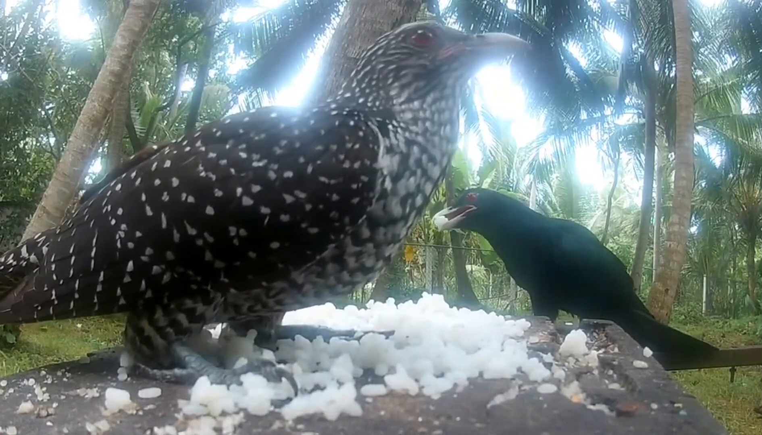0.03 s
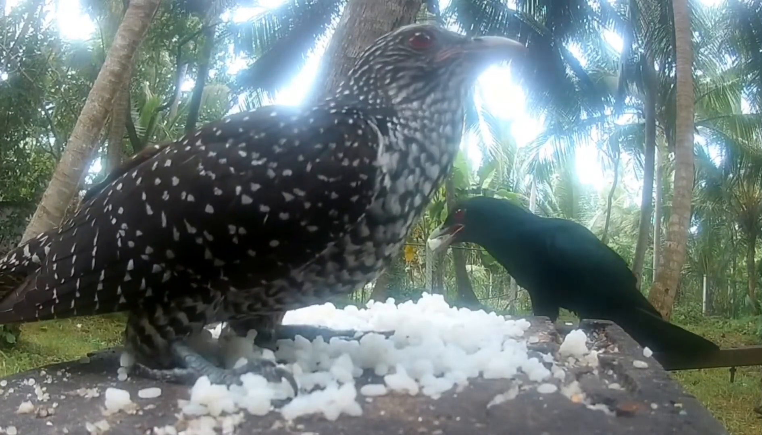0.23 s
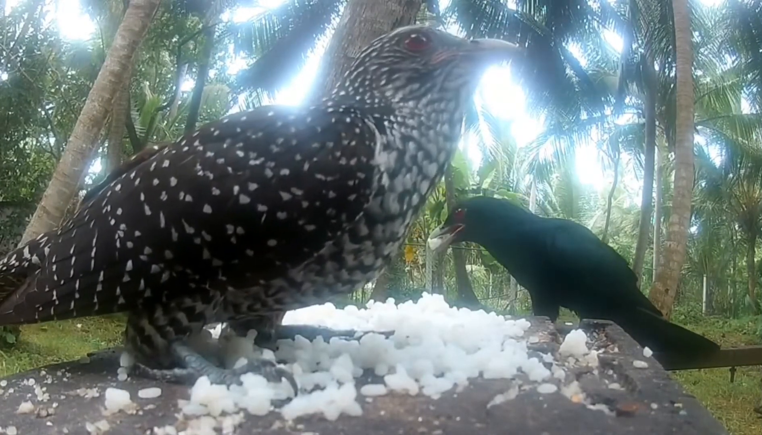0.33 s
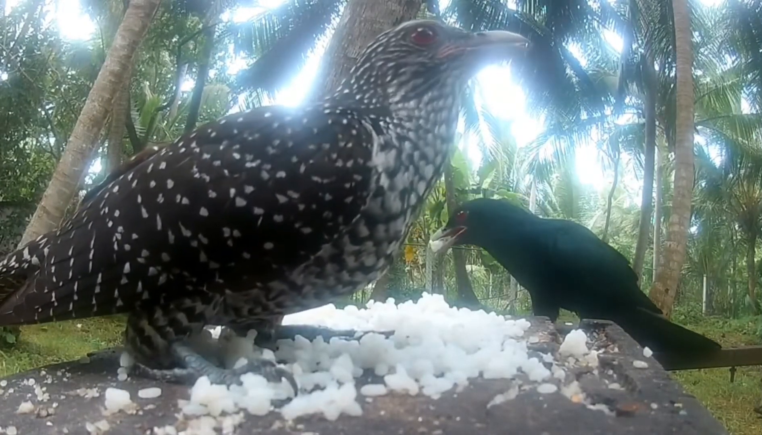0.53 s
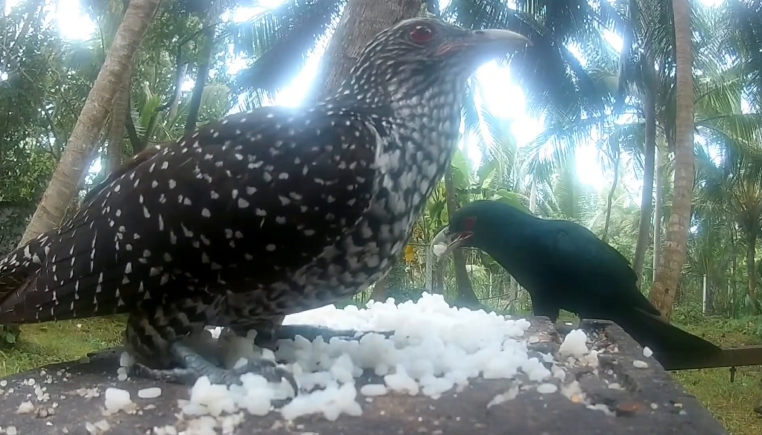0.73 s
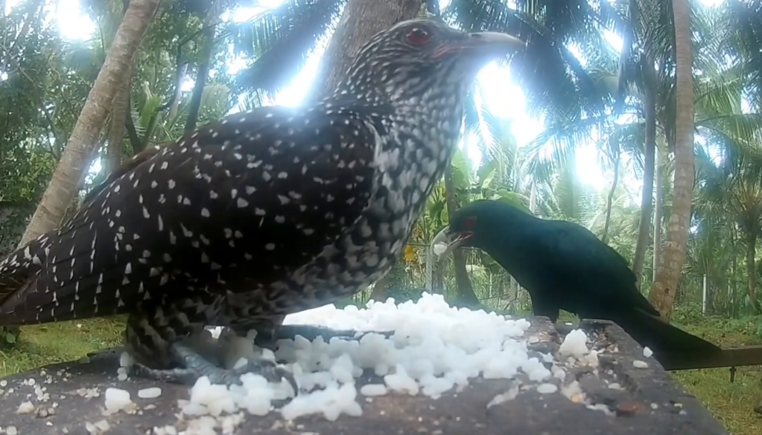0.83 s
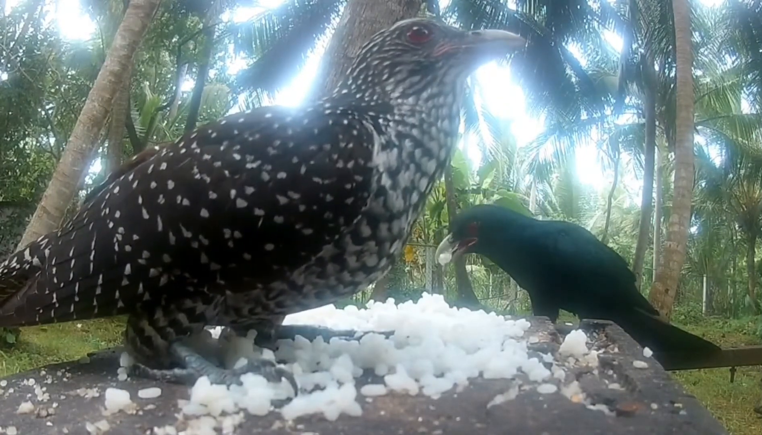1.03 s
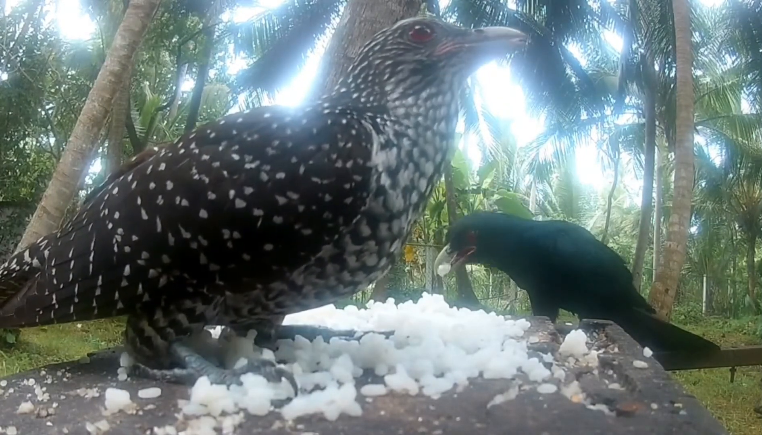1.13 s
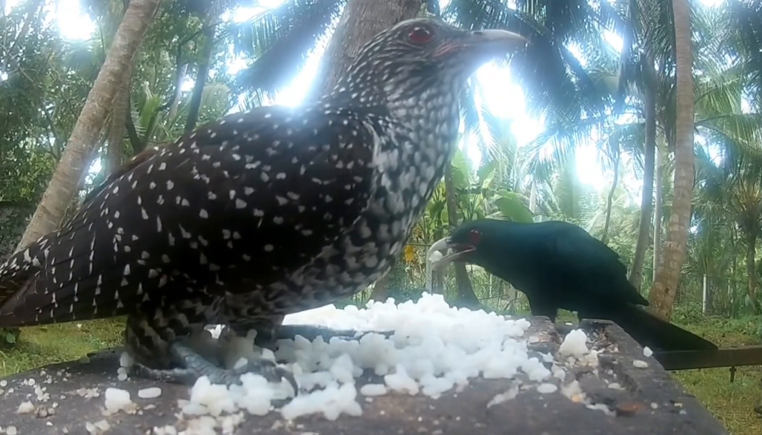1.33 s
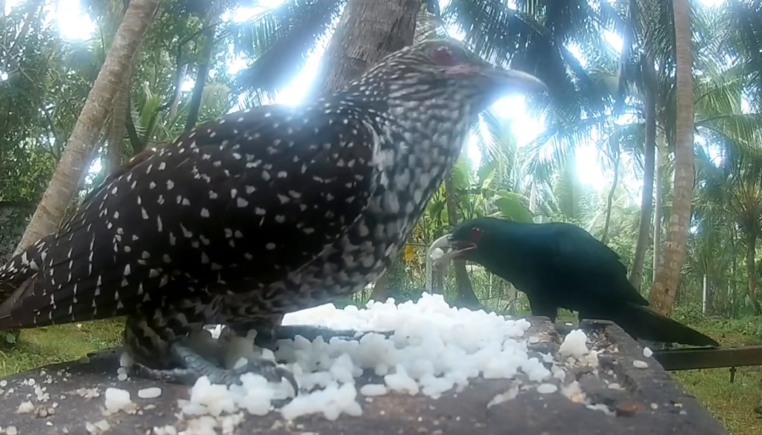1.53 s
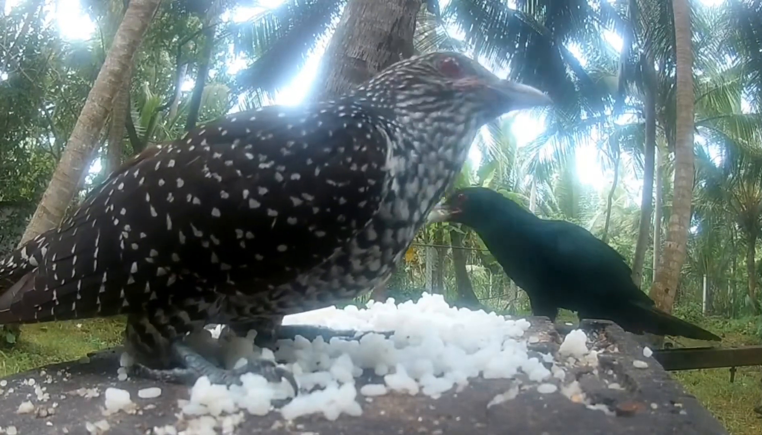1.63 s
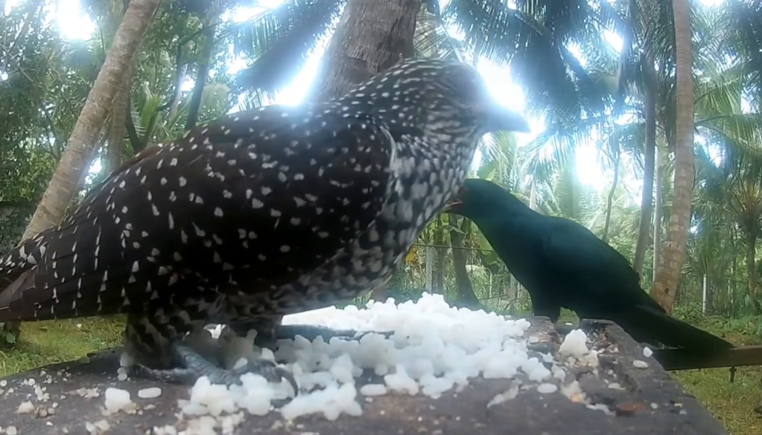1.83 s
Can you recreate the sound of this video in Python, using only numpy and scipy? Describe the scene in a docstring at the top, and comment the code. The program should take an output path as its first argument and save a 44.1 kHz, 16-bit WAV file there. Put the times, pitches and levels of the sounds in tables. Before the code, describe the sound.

A close bird call dominates. The tail of a low croak fades within 0.07 seconds. At about 0.18 a short rasp rises quickly and breaks into a clean, nearly pure whistle, strongest near 0.27, arching up and down before sinking into a low, rough croak from 0.36 to 0.45. Faint scatter follows among trees. Soft outdoor rumble, steady hiss and a very faint hum continue throughout.

```python
"""A bird close by among palm trees, over soft outdoor rumble, even hiss and a faint hum throughout.
First comes the end of an earlier croak. After a gap a rasp breaks into a clean whistle, which arches
up and down and sinks back into a low croak. Rasps and croaks mix uneven harmonics with pulsed noise
shaped by throat and beak; the whistle is a nearly pure tone. The trunks add a short, faint scatter."""
import sys
import numpy as np
from scipy import signal
from scipy.fft import rfft, irfft, next_fast_len
from scipy.io import wavfile
from scipy.ndimage import uniform_filter1d, map_coordinates

SR = 44100
rng = np.random.default_rng(int(sys.argv[2]) if len(sys.argv) > 2 else 0)


def output_pcm(signal):
    """Save a mono or channel-first signal as 16-bit PCM at the path in sys.argv[1].

    Samples are clipped to [-1, 1] before scaling.
    """
    pcm = np.clip(np.atleast_2d(signal).T, -1, 1) * 32767
    wavfile.write(sys.argv[1], SR, np.round(pcm).astype(np.int16))


N = 83790  # length in samples

# Colour of the outdoor rumble and hiss: pitch_hz [Hz], relative level_db [dB per Hz]
AIR_COLOUR = [(12, -29), (22, -5.5), (48, 0), (110, -2.5), (200, -5.5), (310, -8), (550, -13), (1000, -17),
              (1520, -19.5), (1800, -18.5), (2250, -26), (4300, -31.5), (6500, -36), (10500, -38.5),
              (13500, -36.5), (15700, -33.5)]
# Steady tones of the hum: pitch_hz [Hz], level_db [dB, rms]
HUM_TONES = [(60, -77), (120.4, -75.5), (180.6, -78.5), (240.8, -78.5)]
# Three rasps, one list each: time_s [s], pitch_hz [Hz], level_db [dB], roughness [0-1], beak_opening [0-1]
RASP_TRACKS = [
    [(0, 463.3, -51.5, 0.7, 0.1), (.02, 447.7, -56.5, 0.6, 0.3), (.04, 418.2, -58, 0.24, 0.5),
     (.055, 437, -60, .4, 0), (.07, 415, -69, .4, 0.03)],
    [(.18, 398.3, -59, .3, .7), (.188, 423, -54, .35, 0.97), (.196, 478.3, -51, 0.43, 0.99),
     (.204, 514, -46.5, 0.83, 1), (.211, 624, -47, 0.4, 1), (.22, 729, -40.5, 0.63, 1),
     (.228, 798, -60.5, .35, 1), (.248, 832, -63.5, .2, 1)],
    [(.362, 463, -65, 0.6, 0.3), (.373, 440.4, -50, 0.51, 0), (.386, 438, -54, 0.6, 0.1),
     (.394, 428.4, -51.5, 0.32, 0), (.411, 425, -58, 0.6, .1), (.419, 419.4, -54.5, 0.1, 0.04),
     (.427, 430, -63, 0.54, 0.1), (.448, 406, -68, 0.5, 0)],
]
# Throat colour with the beak nearly shut: pitch_hz [Hz], relative level_db [dB]
THROAT_SHUT = [(400, -38.5), (650, -19.5), (850, -12), (1030, -9), (1220, -4), (1360, 1), (1550, -18),
               (2000, -43), (2700, -55), (8000, -60)]
# Throat colour with the beak open: pitch_hz [Hz], relative level_db [dB]
THROAT_OPEN_COLOUR = [(400, -41), (650, -34), (850, -9), (1050, -3.5), (1300, 2), (1550, -2.5), (1720, -11),
                      (1950, -29), (2600, -45), (3400, -28.5), (4200, -44.5), (8000, -68.5)]
# Course of the whistle: time_s [s], pitch_hz [Hz], level_db [dB], octave_level_db [dB]
WHISTLE_TRACK = [(.214, 860, -64, -73.5), (.224, 994, -55, -61.5), (.231, 1025, -48, -76.5),
                 (.24, 1106, -40.5, -80.5), (.25, 1139, -37.5, -78), (.261, 1173, -33, -86),
                 (.273, 1181, -32.5, -81), (.287, 1168, -34, -76.5), (.3, 1140, -36.8, -75.5),
                 (.31, 1102, -39.5, -72), (.321, 1029, -51, -67), (.338, 936, -59, -65),
                 (.348, 873, -52, -64), (.36, 789, -59, -59), (.366, 698, -69.5, -52.5),
                 (.373, 674, -78, -47.5), (.38, 655, -90, -60)]
# Overtones at the whistle's loudest: multiple [of the pitch], level_db [dB re the fundamental]
WHISTLE_OVERTONES = [(3, -23), (4, -67.5), (5, -43.5), (7, -58.5), (9, -59)]
# Thin edge at middling whistle strength: multiple [of the pitch], level_db [dB, rms]
WHISTLE_EDGE = [(4, -83.5), (6, -84.5), (8, -95.5), (10, -91)]

AIR_DB = -64
BAND_HZ, BAND_WIDTH_HZ, BAND_DB = 1306.4, 102, -73.5  # narrow steady rush; width is half the peak's
JITTER, JITTER_RATE_HZ = 0.0251, 400  # pitch scatter of a rasp (fraction), knots a second
FLUTTER_DB, FLUTTER_RATE_HZ = 1.8, 350  # level scatter of a rasp, knots a second
OVERTONE_GROWTH = 0.86  # dB of overtone for each dB of the fundamental
OVERTONE_FADE_DB = -52  # below this strength the overtones die away
EDGE_AT_DB, EDGE_WIDTH_DB = -49.5, 5.5
GROVE_DB, GROVE_T60_S = -25.5, 0.43
TOP_HZ = 15800


def amp(db):
    """Decibels to gain."""
    return 10 ** (np.asarray(db) / 20)


def unit(x):
    """Scale to rms 1."""
    return x / np.sqrt(np.mean(x ** 2) + 1e-20)


def along(points, hz):
    """Read (Hz, value) points on a log frequency axis."""
    f, v = np.transpose(points)
    return np.interp(np.log(hz + 1), np.log(f + 1), v)


def curves(rows):
    """A soft gate over the rows' span, then one smooth curve for each column after the time."""
    t = np.arange(N) / SR
    time_s, *columns = np.transpose(rows)
    gate = 1. * (t >= time_s[0]) * (t <= time_s[-1])
    tracks = [gate] + [np.interp(t, time_s, c) for c in columns]
    return [uniform_filter1d(track, size=200) for track in tracks]


def wobble(rate_hz):
    """A smooth random curve through rate_hz normally distributed knots a second."""
    knots = rng.standard_normal(2048)
    return map_coordinates(knots, [np.arange(N) * rate_hz / SR], mode="mirror")


def filtered(x, response):
    """Multiply the spectrum of x by a response of frequency."""
    m = next_fast_len(N + SR // 2)
    spectrum = rfft(x, m) * response(np.fft.rfftfreq(m, 1 / SR))
    return irfft(spectrum, m)[:N]


def noise(colour):
    """Coloured noise of rms 1."""
    return unit(filtered(rng.standard_normal(N), lambda hz: amp(along(colour, hz))))


def background():
    """Coloured noise for rumble and hiss, a resonant band of rush and steady low sines for the hum."""
    t = np.arange(N) / SR
    band_shape = lambda hz: 1 / (1 + ((hz - BAND_HZ) / BAND_WIDTH_HZ) ** 2)
    band = unit(filtered(rng.standard_normal(N), band_shape))
    hum = sum(amp(db) * np.sqrt(2) * np.sin(2 * np.pi * (hz * t + rng.random()))
              for hz, db in HUM_TONES)
    return amp(AIR_DB) * noise(AIR_COLOUR) + amp(BAND_DB) * band + hum


def rasp(rows, count=9):
    """Slow, uneven vibration and pulsed air noise, both shaped by the throat and beak."""
    gate, hz, db, rough, opening = curves(rows)
    rough, opening = np.clip(rough, 0, 1), np.clip(opening, 0, 1)
    phase = 2 * np.pi * np.cumsum(hz * (1 + JITTER * wobble(JITTER_RATE_HZ))) / SR

    k = np.arange(1, count + 1)[:, None]  # harmonic numbers
    shut_db, open_db = along(THROAT_SHUT, k * hz), along(THROAT_OPEN_COLOUR, k * hz)
    gains = amp((1 - opening) * shut_db + opening * open_db)
    harmonics = np.sum(gains * np.cos(k * phase), axis=0)
    voiced = np.sqrt(2) * harmonics / np.linalg.norm(gains, axis=0)

    air = np.sqrt(1 - opening) * noise(THROAT_SHUT) + np.sqrt(opening) * noise(THROAT_OPEN_COLOUR)
    air = unit(air * (1 + 0.15 * np.cos(phase)))  # pulsed once a vibration
    flutter = unit(amp(FLUTTER_DB * wobble(FLUTTER_RATE_HZ)))
    mix = np.sqrt(1 - rough ** 2) * voiced + rough * air
    return gate * amp(db) * flutter * mix


def whistle(waver=.012, shake_db=2):
    """A nearly pure tone whose overtones swell with its strength; it is unsteady while weak."""
    gate, hz, db, octave_db = curves(WHISTLE_TRACK)
    firm = 1 / (1 + amp(2 * (OVERTONE_FADE_DB - db)))  # 0 weak, 1 strong
    unsteady_hz = hz * (1 + waver * (1 - firm) * wobble(170))
    phase = 2 * np.pi * np.cumsum(unsteady_hz) / SR
    fundamental = amp(db + shake_db * (1 - firm) * wobble(150)) * np.sin(phase)
    octave = amp(octave_db) * np.sin(2 * phase)

    peak_db = db.max()
    swell = firm * amp(peak_db + OVERTONE_GROWTH * (db - peak_db))
    edge = np.exp(-.5 * ((db - EDGE_AT_DB) / EDGE_WIDTH_DB) ** 2)  # strongest in passing
    stack = lambda rows: sum(amp(level) * np.sin(round(k) * phase) for k, level in rows)
    overtones = swell * stack(WHISTLE_OVERTONES) + edge * stack(WHISTLE_EDGE)
    return np.sqrt(2) * gate * (fundamental + octave + overtones)


def grove(x):
    """A faint, short scatter from the trunks: x smeared by decaying noise of unit energy."""
    t = np.arange(SR // 2) / SR
    tail = rng.standard_normal(len(t)) * amp(-60 * t / GROVE_T60_S)
    return signal.fftconvolve(x, tail / np.linalg.norm(tail))[:N]


def scene():
    """The bird close by, its scatter in the grove, and the background, in one channel."""
    bird = sum(rasp(rows) for rows in RASP_TRACKS) + whistle()
    return (bird + amp(GROVE_DB) * grove(bird) + background())[None]


def record(dry):
    """The recorder keeps nothing above its band limit."""
    return np.array([filtered(x, lambda hz: hz < TOP_HZ) for x in dry])


dry = scene()
out = record(dry)
output_pcm(out)
```